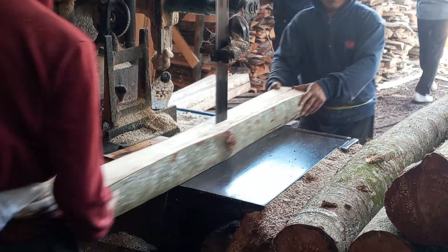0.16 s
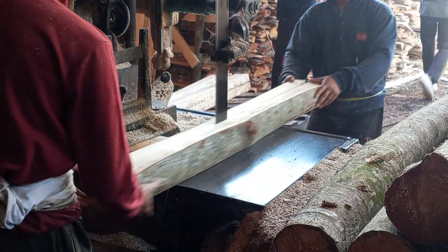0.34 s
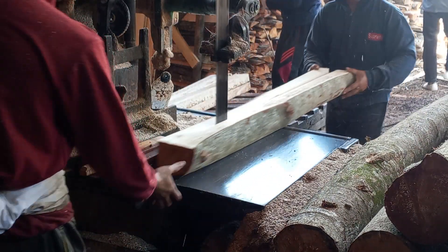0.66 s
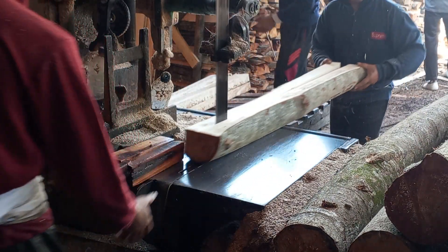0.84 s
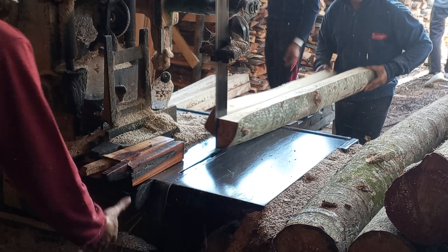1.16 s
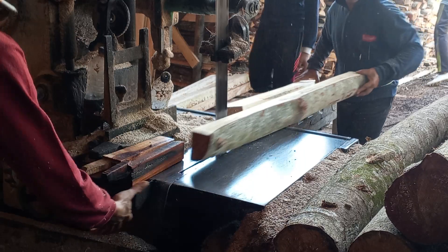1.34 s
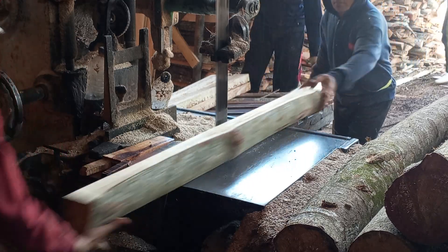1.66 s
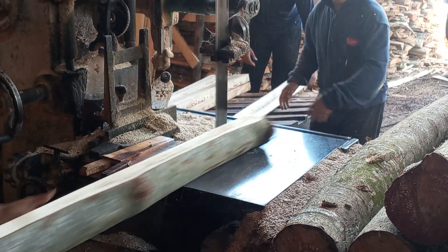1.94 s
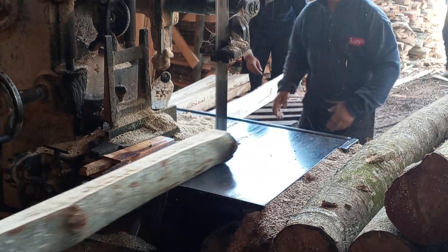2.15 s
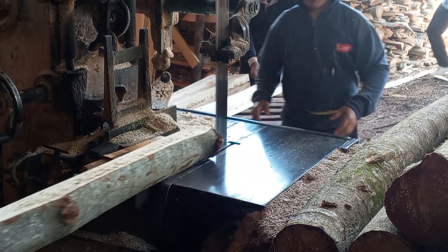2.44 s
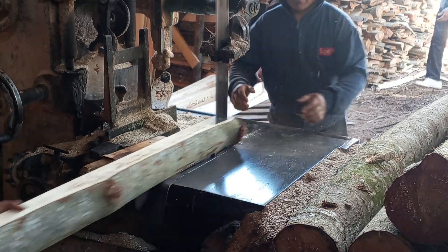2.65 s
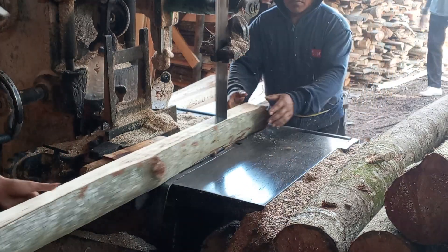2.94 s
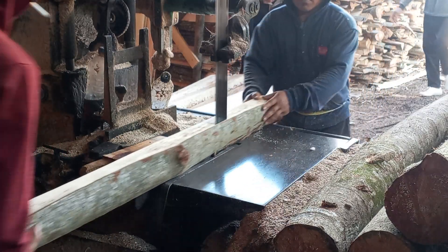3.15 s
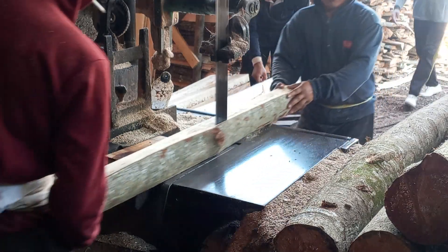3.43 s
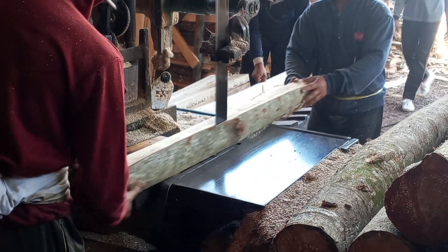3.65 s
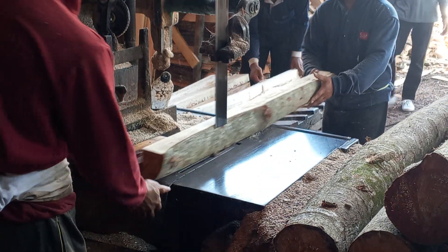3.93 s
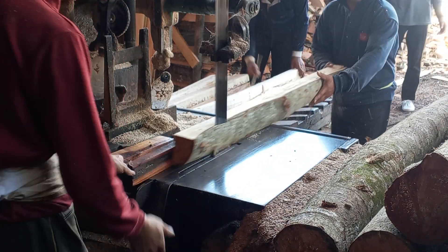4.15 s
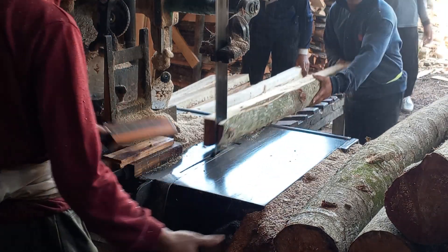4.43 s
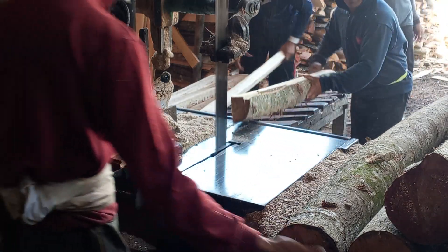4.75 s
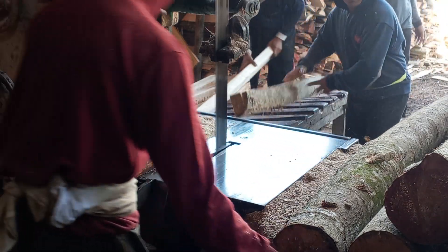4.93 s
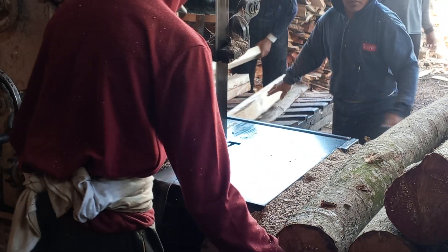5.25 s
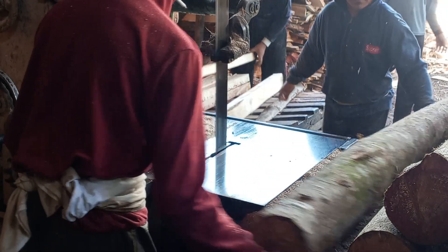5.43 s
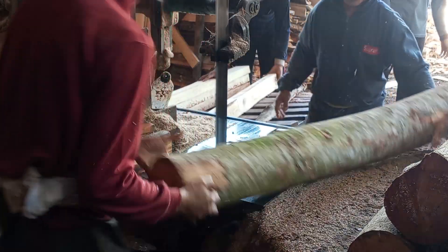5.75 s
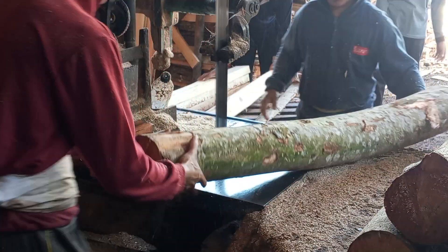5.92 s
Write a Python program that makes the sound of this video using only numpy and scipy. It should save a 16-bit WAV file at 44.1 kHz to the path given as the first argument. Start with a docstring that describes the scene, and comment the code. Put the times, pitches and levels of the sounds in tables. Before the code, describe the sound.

A band saw runs throughout, close and centred, in an open shed with little echo: a dense bright hiss, steely rattle and rubbing, a faint wavering flutter note, and a dull unsteady drive rumble, throbbing about twice a second. From the start the teeth are already in wood, adding a rough buzzing whine and a dusty spray until about 1.1 s, when the blade springs free and the hiss dips briefly. At 1.75-1.85 s the beam knocks on the table in a rapid hollow cluster. At 2.6 s the teeth bite with a sharp tearing burst and short squeal, then settle into a second whining cut, slightly lower under load, with a thin high singing around 4.0-4.4 s. It ends at 4.5 s. The free blade hisses and flutters on; a thrown board thumps and bounces at 5.16 s, and a log lands in muffled woody bumps from 5.7 s, with faint taps near 5.85 s. The saw is still running at the end.

```python
"""A vertical band saw runs in an open shed and rips a squared log in two passes, the first already under way.
Filtered noise and ringing band modes make its rattle, rub and hiss; a wavering tone makes its flutter.
In the wood, multiples of the tooth rate add a whine, and noise pulsed by the teeth a spray of dust.
Between the passes the beam knocks on the table; later a board is thrown down and the next log is set in place:
bouncing clicks ring wood modes."""
import sys
import numpy as np
from scipy import signal
from scipy.fft import rfft, irfft
from scipy.io import wavfile

SR = 44100
rng = np.random.default_rng(int(sys.argv[2]) if len(sys.argv) > 2 else 0)


def store_pcm(level_fs):
    """Save levels as 16-bit WAV."""
    pcm = np.round(np.clip(level_fs, -1, 1) * 32767).astype(np.int16)
    wavfile.write(sys.argv[1], SR, np.atleast_2d(pcm).T)


N = 268569
TIME = np.arange(N) / SR  # s
BINS = np.maximum(np.arange(N // 2 + 1) * SR / N, 1)  # Hz


def from_db(db):
    """Decibels to amplitude gain."""
    return 10 ** (np.asarray(db) / 20)


def rms_one(x):
    """Scale to unit rms."""
    return x / np.sqrt(np.mean(x ** 2) + 1e-20)


def in_time(rows):
    """Interpolate the columns of a time curve at every sample."""
    time_s, *columns = np.transpose(rows)
    return [np.interp(TIME, time_s, column) for column in columns]


def envelope(start_s, attack_s, hold_s, release_s):
    """Linear rise from 0 to 1, hold, linear fall."""
    rise = (TIME - start_s) / attack_s
    fall = 1 - (TIME - start_s - attack_s - hold_s) / release_s
    return np.clip(np.minimum(rise, fall), 0, 1)


def swells(rows, attack_s, release_s):
    """Gain of a tone that builds up, holds and dies away, time after time."""
    return sum(from_db(db) * envelope(start_s, attack_s, hold_s, release_s) for start_s, hold_s, db in rows)


def drift(rate_hz):
    """Smooth random curve of rms 1: noise through two equal poles at rate_hz."""
    step = 20  # samples between slow points
    pole = np.exp(-2 * np.pi * rate_hz * step / SR)
    noise = rng.standard_normal(N // step + 2002)
    slow = signal.lfilter([1], [1, -2 * pole, pole * pole], noise)[2000:]  # settled part
    return np.interp(np.arange(N) / step, np.arange(len(slow)), rms_one(slow))


def friction(rough_db, rough_hz):
    """Countless small contacts under unsteady pressure: noise with a drifting level."""
    return rng.standard_normal(N) * from_db(rough_db * drift(rough_hz))


def coloured(force, colour):
    """A force heard through a broad colour and the resonances of the steel; rms 1."""
    # steel resonances: centre_hz, width_hz, peak_db
    steel = [(262, 35, 4), (458, 12, 2.5), (696, 24, 3), (1040, 10, 2.5), (1157, 63, 5.5), (1181, 24, 5.5),
             (1271, 22, 7), (1387, 32, 4.5), (1650, 27, 5), (2192, 20, 5.5), (2388, 28, 6.5),
             (2450, 79, 0.5), (2786, 35, 6), (2842, 33, -1.5), (3620, 35, 2.5)]
    hz, db = np.transpose(colour)
    response = from_db(np.interp(np.log(BINS), np.log(hz), db, left=-70, right=-70)) + 0j
    for centre_hz, width_hz, peak_db in steel:
        response *= 1 + (from_db(peak_db) - 1) / (1 + 2j * (BINS - centre_hz) / width_hz)
    return rms_one(irfft(rfft(force) * response, N))


def ring(clicks, hz, t60_s):
    """A unit click sets a mode of height 1 ringing; it radiates little below its own pitch."""
    pole = from_db(-60 / (t60_s * SR))
    angle = 2 * np.pi * hz / SR
    return signal.lfilter([.5, 0, -.5], [1, -2 * pole * np.cos(angle), pole * pole], clicks + 1e-18)


def partial(phase, scatter, scatter_hz):
    """A tone with scattered reflections that blur its strength and phase; rms 1."""
    in_phase = (1 + scatter * drift(scatter_hz)) * np.sin(phase)
    quadrature = scatter * drift(scatter_hz) * np.cos(phase)
    return rms_one(in_phase + quadrature)


def passes():
    """Effect of each pass on the band: depth, bite, grip, recoil (0-1), tooth rate (Hz), hiss change (dB)."""
    # passes through the wood: entry_s, exit_s, loaded_tooth_hz, hiss_change_db
    pass_rows = [(-0.8, 1.115, 972, -0.5), (2.622, 4.51, 968.5, -1)]
    free_tooth_hz, sag_s = 999, 0.2  # unloaded band; time constant of its slowing
    entry_depth, sink_s = 0.52, 0.27  # share that bites at once; time constant of the rest
    bite_attack_s, bite_hold_s, bite_release_s = 0.007, 0.033, 0.043
    exit_s = 0.025
    grip_delay_s, grip_ramp_s, grip_hold_s = 0.075, 0.03, 0.06
    recoil_ramp_s, recoil_hold_s = 0.023, 0.025

    depth, bite, grip, recoil, hiss_change_db = np.zeros((5, N))
    tooth_hz = np.full(N, float(free_tooth_hz))
    for entry_s, leave_s, loaded_hz, change_db in pass_rows:
        age_s = np.maximum(TIME - entry_s, 0)
        inside = envelope(entry_s, bite_attack_s, leave_s - entry_s, exit_s)
        sunk = inside * (1 - (1 - entry_depth) * np.exp(-age_s / sink_s))
        depth += sunk
        hiss_change_db += change_db * sunk
        tooth_hz -= inside * (free_tooth_hz - loaded_hz) * (1 - np.exp(-age_s / sag_s))
        bite += envelope(entry_s, bite_attack_s, bite_hold_s, bite_release_s)
        # the fresh kerf grips the band
        grip += envelope(entry_s + grip_delay_s, grip_ramp_s, grip_hold_s, grip_ramp_s)
        # leaving the wood, the band springs clear of its guides
        recoil += envelope(leave_s, recoil_ramp_s, recoil_hold_s, recoil_ramp_s)
    return np.clip(depth, 0, 1), bite, grip, recoil, tooth_hz, hiss_change_db


def running_blade(depth, grip, recoil, hiss_change_db):
    """The band shakes the frame, rattles, rubs in its guides and whips the air: five layers of noise."""
    # broad colours: freq_hz, relative_density_db
    frame_colour = [(700, -30), (880, -3.5), (980, -4.5), (1200, -3), (1500, -1.5), (1900, 0), (2150, -6),
                    (2600, -23)]
    rattle_colour = [(1600, -17), (2100, -3.5), (2330, -5.5), (2450, 0), (2900, 0.5), (3300, -0.5),
                     (3550, -1), (3820, 1), (4050, -6.5), (4350, -9.5), (5000, -9), (5700, -12)]
    rub_colour = [(4300, -24), (5100, -11), (5600, -4.5), (5900, -0.5), (6300, 0), (6700, 2), (6950, -4.5),
                  (7400, -15), (8300, -9)]
    hiss_colour = [(6300, -43), (7300, -7.5), (8200, -11.5), (8620, -2), (8950, -8), (9600, -2),
                   (10300, 0.5), (11100, 0), (11800, -6), (12600, -14), (13900, -23), (14600, -16.5),
                   (15800, -20), (17000, -30)]
    # pressure of the band on its guides, only its swing about the mean is used: time_s, level_db
    bearing_curve = [(0.0, -18), (0.13, -15.5), (0.27, -17.5), (1.02, -16), (1.17, -18.5), (1.22, -17.5),
                     (1.42, -19.5), (2.24, -16.5), (2.61, -19), (2.68, -19), (2.71, -22.5), (2.98, -17),
                     (4.41, -18), (4.49, -16.5), (4.55, -20), (4.63, -16.5), (6.0, -18.5), (6.09, -15.5)]
    # frame clatter before lap and recoil: time_s, level_db
    frame_curve = [(0, -30.3), (0.9, -30.5), (1.25, -29.5), (1.5, -29.5), (2.6, -29.5), (2.88, -31.5),
                   (3.2, -27.5), (3.45, -30), (4.4, -31.2), (4.65, -29), (6.09, -29)]
    # high hiss before its offset and change in the wood: time_s, level_db
    hiss_curve = [(0.0, -20), (0.96, -18.5), (1.1, -21), (1.15, -26), (1.24, -22), (1.54, -24), (2.02, -22),
                  (2.07, -24), (2.22, -21), (2.53, -24), (3.44, -20), (4.44, -23), (4.49, -18),
                  (4.55, -25.5), (4.66, -22.5), (5.82, -21.5), (5.97, -24.5), (6.09, -21)]
    # guide noise: idle_db, in_wood_db, bearing_share, gripped_db, recoil_db (last two and in_wood are changes)
    rattle_noise = (-24.0, -2.1, 0.8, -2, -1.5)
    rub_noise = (-24.5, -1.4, 0.5, -0.5, -1)
    # bending modes of the band: freq_hz, relative_db, t60_s
    band_modes = [(2424, -10, 0.049), (2483, -13, 0.035), (2655, -17, 0.021), (2792, -12.5, 0.13),
                  (3036, -18.5, 0.035), (3528, -14, 0.047), (3730, -14, 0.035), (5970, -15.5, 0.013),
                  (6250, -12.5, 0.018), (6570, -15, 0.023)]
    lap_hz, lap_peak_s, lap_swing_db = 2.07, 0.29, 1.1
    frame_recoil_db, hiss_offset_db = -2.5, 0.9
    flares_db, flares_in_wood_db = 3, -2.5  # against the rattle; the wood damps them

    bearing_db, = in_time(bearing_curve)
    bearing_swing_db = bearing_db - bearing_db.mean()

    def guide_level_db(settings):
        """Level of a guide noise, following bearing, wood, grip and recoil."""
        idle_db, in_wood_db, share, gripped_db, recoil_db = settings
        return idle_db + in_wood_db * depth + share * bearing_swing_db + gripped_db * grip + recoil_db * recoil

    rattle_db = guide_level_db(rattle_noise)
    rub_db = guide_level_db(rub_noise)

    # the frame throbs once a lap of the band
    lap_db = lap_swing_db * np.cos(2 * np.pi * lap_hz * (TIME - lap_peak_s))
    frame_db, = in_time(frame_curve)
    frame_gain = from_db(frame_db + lap_db + frame_recoil_db * recoil)
    frame = frame_gain * coloured(friction(rough_db=1.5, rough_hz=22), frame_colour)
    rattle = from_db(rattle_db) * coloured(friction(rough_db=1.13, rough_hz=16), rattle_colour)

    # each mode is rubbed into short flares of its own
    flares = np.zeros(N)
    for hz, mode_db, t60_s in band_modes:
        rubbing = friction(rough_db=4.0, rough_hz=14.6)
        flares += from_db(mode_db) * rms_one(ring(rubbing, hz, t60_s))
    flares *= from_db(rattle_db + flares_db + flares_in_wood_db * depth)

    rub = from_db(rub_db) * coloured(friction(rough_db=1.5, rough_hz=18.5), rub_colour)
    hiss_db, = in_time(hiss_curve)
    hiss_gain = from_db(hiss_db + hiss_offset_db + hiss_change_db)
    hiss = hiss_gain * coloured(friction(rough_db=0.9, rough_hz=32), hiss_colour)
    return frame + rattle + flares + rub + hiss


def flutter():
    """The free span of the band swells and fades on one wavering note."""
    # loudest swells: start_s, hold_s, level_db
    loud_swells = [(0.08, 0.015, -31), (0.35, 0.015, -30.5), (0.71, 0.025, -28), (0.98, 0.015, -32),
                   (2.07, 0.033, -32), (2.27, 0.02, -27.5), (4.21, 0.25, -29.5), (4.85, 0.025, -26),
                   (5.01, 0.012, -25), (6.04, 0.05, -25)]
    flutter_hz, waver = 903, 0.00903  # waver: rms share of the pitch
    weak_db, weak_swing_db, weak_rate_hz = -36, 3, 18  # weaker swells come by chance
    loud = swells(loud_swells, attack_s=0.022, release_s=0.031)
    weak = from_db(weak_db + weak_swing_db * drift(weak_rate_hz))
    phase = 2 * np.pi * np.cumsum(flutter_hz * (1 + waver * drift(20.2))) / SR
    return np.hypot(loud, weak) * partial(phase, scatter=0.42, scatter_hz=51)


def cutting(depth, bite, tooth_hz):
    """Teeth strike the wood about a thousand times a second: whine, squeal, and dust from the kerf."""
    # whine: tooth_rate_multiple, relative_db
    whine_partials = [(1, -8.5), (3, -1), (4, -4), (5, -12), (6, -4.5), (7, -9), (8, -13.5), (9, -12),
                      (10, -4), (11, -1.5), (12, -9), (13, -15), (14, -22), (15, -15), (16, -19)]
    # feed force as whine level, before depth: time_s, level_db
    feed_curve = [(0, -30), (0.3, -31.5), (0.7, -33.5), (1.05, -28.5), (2.62, -19.5), (2.69, -18.5),
                  (2.76, -30), (2.85, -27.5), (3.38, -26), (3.6, -33), (3.85, -31), (4.1, -27.5),
                  (4.5, -30.5)]
    # the blade sings at twice the tooth rate: start_s, hold_s, level_db
    squeals = [(0.18, 0.06, -36), (1.07, 0.02, -33), (2.622, 0.036, -23.5), (2.83, 0.02, -33),
               (3.0, 0.09, -36), (3.69, 0.3, -40), (4.01, 0.317, -26)]
    # broad colours: freq_hz, relative_density_db
    dust_colour = [(3000, 4), (7000, -19), (9000, -7), (11700, 9), (12500, 3), (13000, -5), (13550, -4),
                   (13900, -11), (14450, 9), (15500, -1), (17000, -10)]
    bite_colour = [(400, -27), (750, -2), (1000, -4), (1500, -4), (1950, 2), (2400, -4), (3500, -13),
                   (6000, -7), (12000, -28)]
    flicker_db, squeal_floor_db, dust_db, bite_db = 2, -41.5, -31, -20.5

    # uneven tooth spacing blurs the high multiples most
    phase = 2 * np.pi * np.cumsum(tooth_hz * (1 + 0.00403 * drift(150.5))) / SR

    whine = np.zeros(N)
    for multiple, db in whine_partials:
        dulling_db = -1.5 * multiple * (1 - depth)  # a shallow cut is duller
        gain = from_db(db + dulling_db + flicker_db * drift(12))
        start_phase = rng.uniform(0, 2 * np.pi)
        whine += gain * partial(multiple * phase + start_phase, scatter=1.13, scatter_hz=22.6)
    feed_db, = in_time(feed_curve)
    whine *= from_db(feed_db) * np.sqrt(depth)

    squeal_gain = from_db(squeal_floor_db) * depth + swells(squeals, attack_s=0.01, release_s=0.04)
    squeal = squeal_gain * partial(2 * phase, scatter=0.2, scatter_hz=19)

    # each tooth throws its own puff of dust
    puffs = friction(rough_db=-0.5, rough_hz=40) * (1 + 0.88 * np.cos(phase))
    dust = from_db(dust_db) * depth * coloured(puffs, dust_colour)
    # the first teeth tear at the end grain
    tearing = from_db(bite_db) * bite * coloured(puffs, bite_colour)
    return whine + squeal + dust + tearing


def drive():
    """Rumble of the drive and its belts: low noise of unsteady level."""
    # freq_hz, relative_density_db
    drive_colour = [(20, -28), (40, -16), (60, -11.5), (85, -12), (110, -4), (165, -7.5), (200, 0),
                    (290, -1.5), (335, -5.5), (440, 3), (620, -0.5), (700, 3), (850, 3.5), (1100, 5)]
    # time_s, level_db
    drive_curve = [(0, -32.5), (1.0, -34), (1.25, -31.5), (1.6, -33), (2.4, -33), (2.8, -36.5),
                   (3.1, -33.5), (4.15, -32.5), (4.7, -32.5), (6.09, -32)]
    drive_db, = in_time(drive_curve)
    return from_db(drive_db) * coloured(friction(rough_db=1.8, rough_hz=24), drive_colour)


def timber(blows, modes, contact_hz):
    """Wood lands softly (low-pass) and bounces; each contact strikes every mode with its own strength."""
    seconds, blow_db = np.transpose(blows)
    chance_db = rng.standard_normal((len(blows), len(modes)))
    ringing = np.zeros(N)
    for k, (hz, mode_db, t60_s) in enumerate(modes):
        clicks = np.zeros(N)
        clicks[(seconds * SR).astype(int)] = from_db(blow_db + mode_db + chance_db[:, k])
        ringing += ring(clicks, hz, t60_s)
    return signal.sosfilt(signal.butter(2, contact_hz, fs=SR, output="sos"), ringing)


def beam_knocks():
    """The beam knocks on the saw table, ringing its modes."""
    # time_s, level_db
    beam_blows = [(1.752, -27), (1.769, -19.5), (1.774, -19.5), (1.794, -22), (1.809, -27), (1.844, -26.5)]
    # freq_hz, relative_db, t60_s
    beam_modes = [(101, -10, 0.13), (169, -14, 0.069), (310, -4, 0.057), (610, 3.5, 0.058), (1400, -6, .04)]
    return timber(beam_blows, beam_modes, contact_hz=2000)


def board_drop():
    """A board is thrown down and bounces, ringing its modes."""
    # time_s, level_db
    board_blows = [(5.160, -23.5), (5.169, -25), (5.188, -29), (5.213, -34)]
    # freq_hz, relative_db, t60_s
    board_modes = [(62, -2.5, 0.13), (113, -4.5, 0.096), (165, 1, 0.058), (292, -1.5, 0.037),
                   (412, -3, .04), (570, -3, 0.053)]
    return timber(board_blows, board_modes, contact_hz=2200)


def log_placing():
    """The next log is set in place in several contacts, ringing its modes."""
    # time_s, level_db
    log_blows = [(5.674, -37), (5.684, -25.5), (5.691, -34), (5.711, -26), (5.85, -40), (5.871, -42)]
    # freq_hz, relative_db, t60_s
    log_modes = [(140, -25, .08), (273, -0.5, 0.14), (408, -3, 0.1), (565, 1, 0.046), (685, 3.5, 0.046)]
    return timber(log_blows, log_modes, contact_hz=1500)


def shed(x):
    """Diffuse reflections from roof and stacks die quickly: a decaying noise tail of unit energy."""
    t60_s, first_echo_s = 0.28, 0.006
    t = TIME[:SR // 2]
    tail = rng.standard_normal(len(t)) * from_db(-60 * t / t60_s) * (t > first_echo_s)
    return signal.fftconvolve(x, tail / np.linalg.norm(tail))[:N]


def scene():
    """Saw, drive and timber heard from one point beside the table, alike in both channels."""
    depth, bite, grip, recoil, tooth_hz, hiss_change_db = passes()
    saw = running_blade(depth, grip, recoil, hiss_change_db) + flutter()
    saw += cutting(depth, bite, tooth_hz) + drive()
    knocks = beam_knocks() + board_drop() + log_placing()
    echoes = from_db(-10) * shed(knocks)
    mono = saw + knocks + echoes
    return np.array([mono, mono])


def record(dry):
    """The microphone thins the deep bass; the top is cut steeply."""
    low_cut_hz, top_cut_hz = 45, 15800
    thinned = signal.sosfilt(signal.butter(2, low_cut_hz, "high", fs=SR, output="sos"), dry)
    return signal.sosfiltfilt(signal.ellip(12, .02, 70, top_cut_hz, fs=SR, output="sos"), thinned)


dry = scene()
out = record(dry)
store_pcm(out)
```